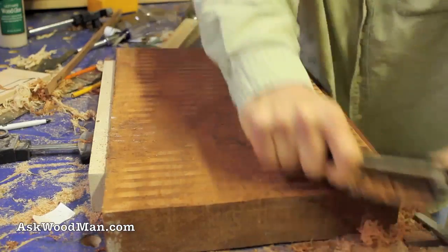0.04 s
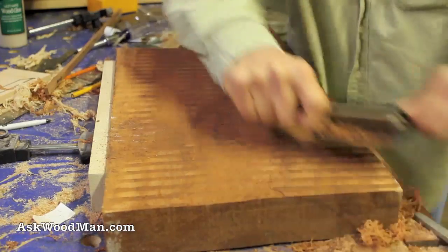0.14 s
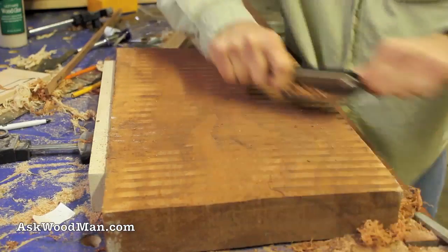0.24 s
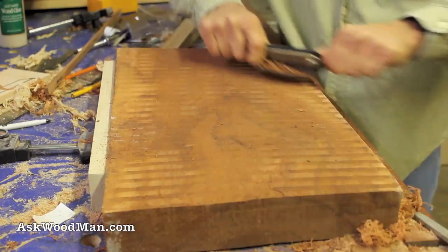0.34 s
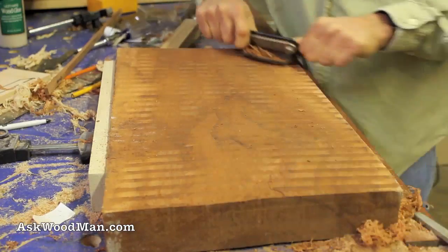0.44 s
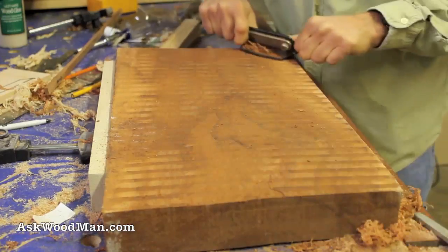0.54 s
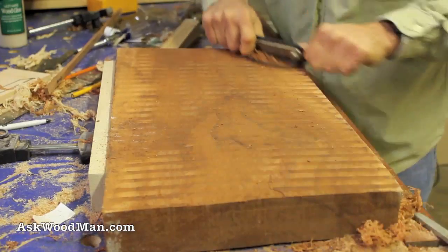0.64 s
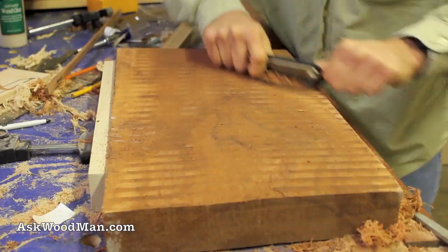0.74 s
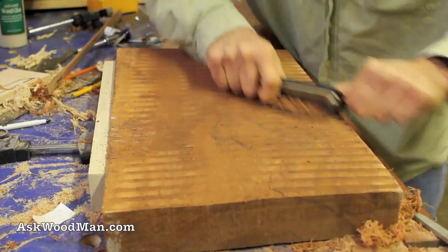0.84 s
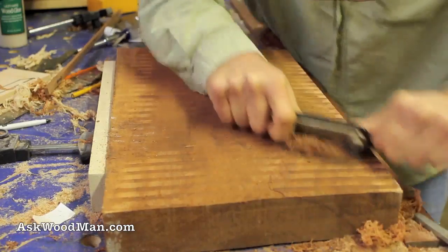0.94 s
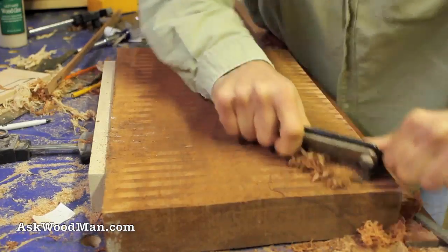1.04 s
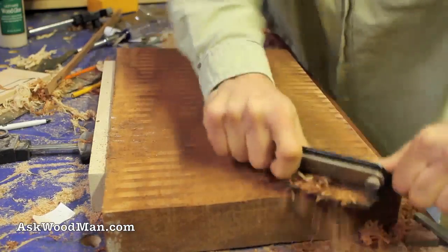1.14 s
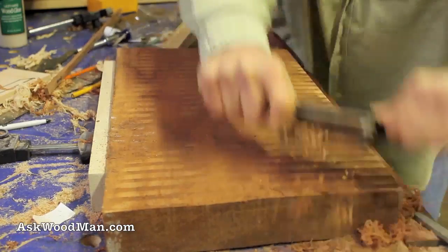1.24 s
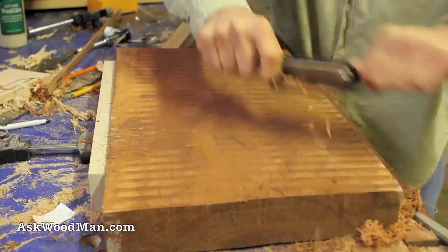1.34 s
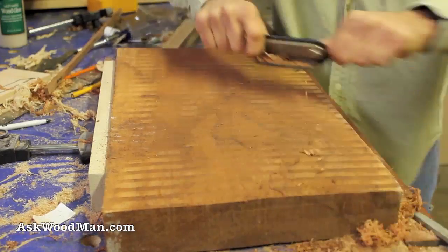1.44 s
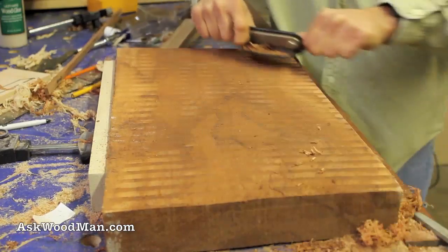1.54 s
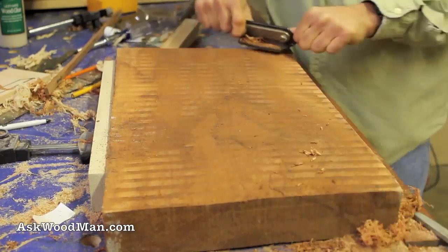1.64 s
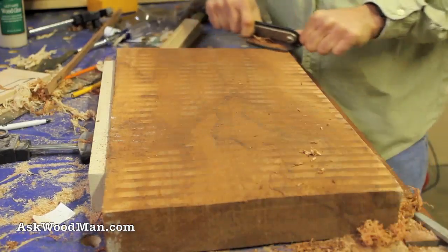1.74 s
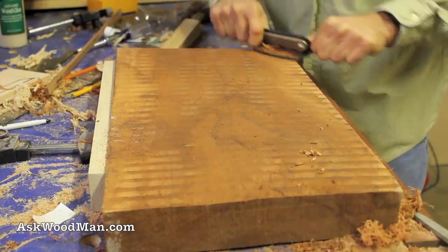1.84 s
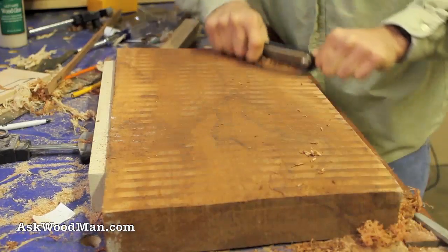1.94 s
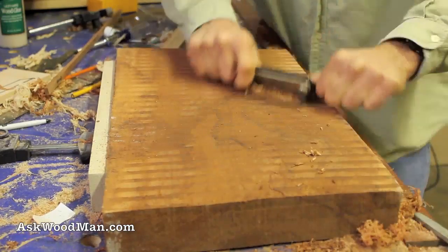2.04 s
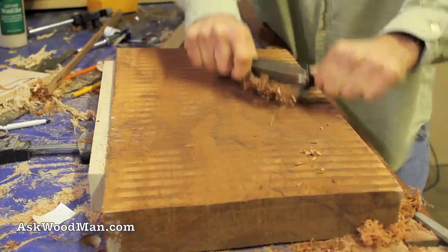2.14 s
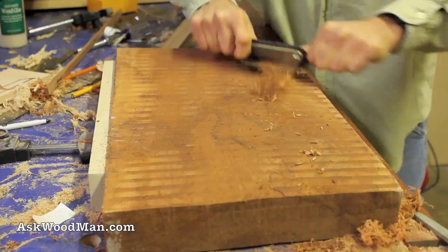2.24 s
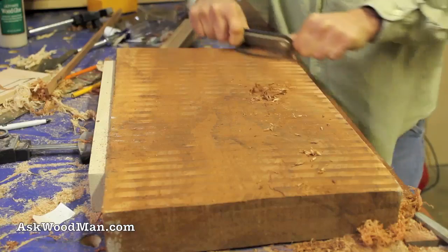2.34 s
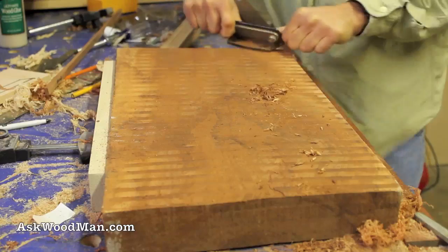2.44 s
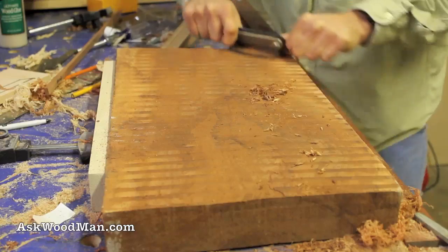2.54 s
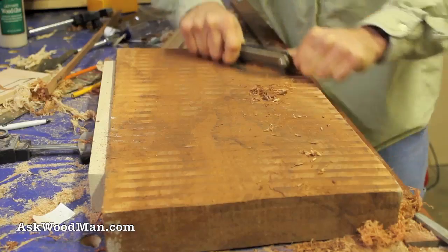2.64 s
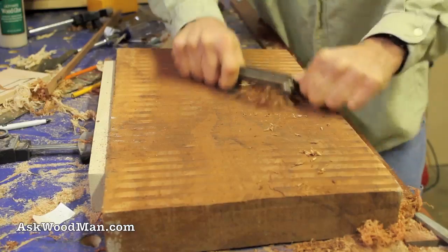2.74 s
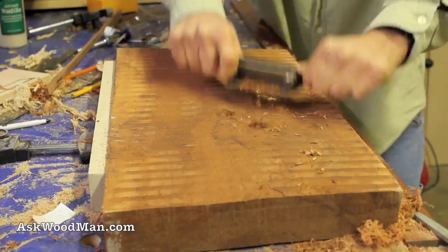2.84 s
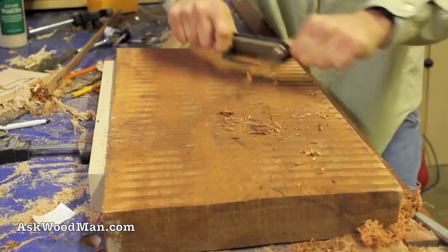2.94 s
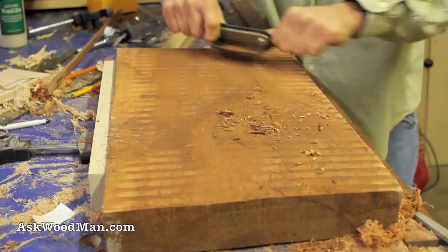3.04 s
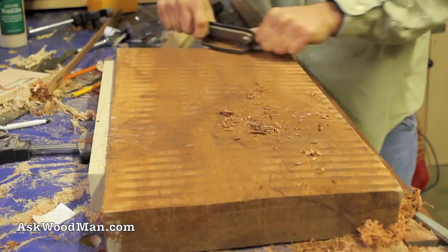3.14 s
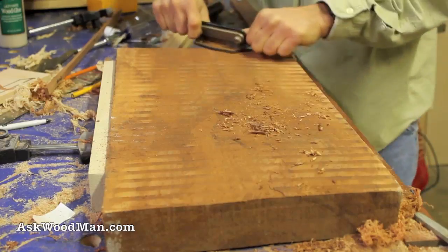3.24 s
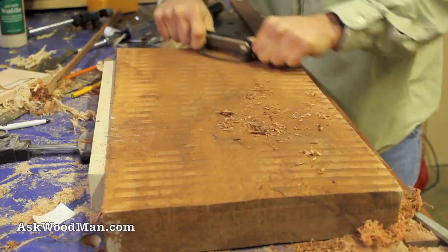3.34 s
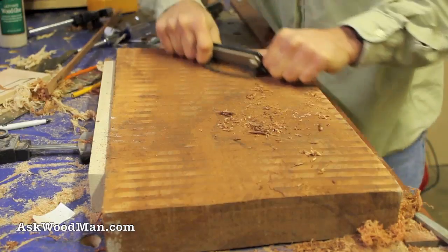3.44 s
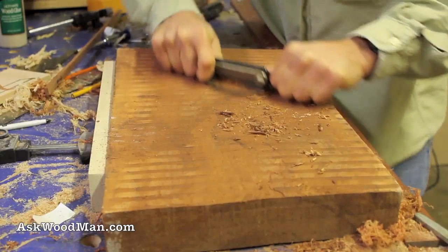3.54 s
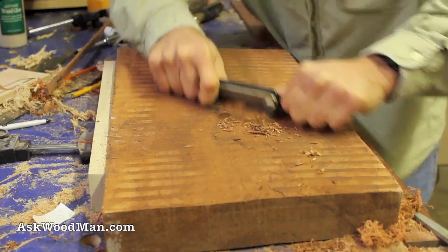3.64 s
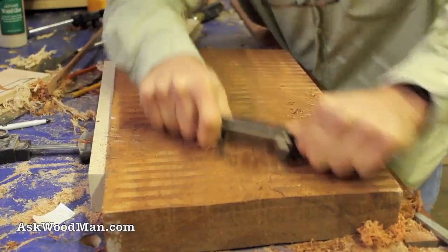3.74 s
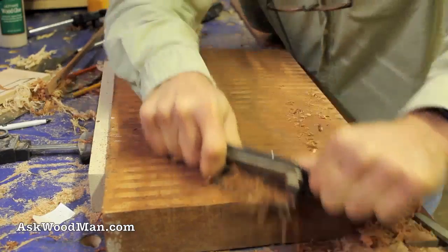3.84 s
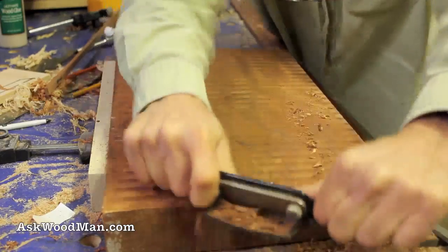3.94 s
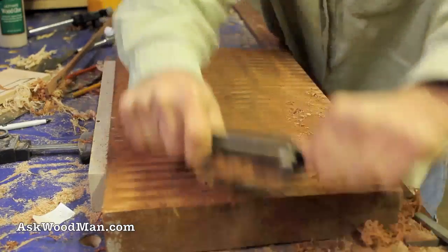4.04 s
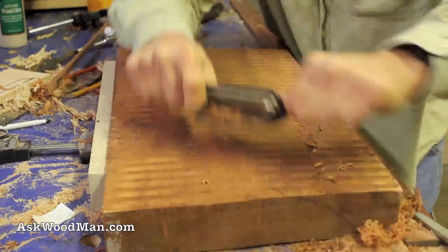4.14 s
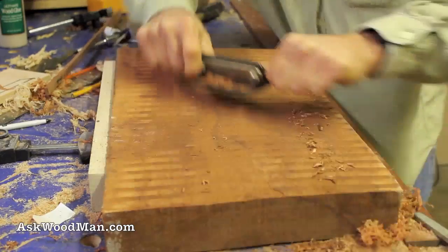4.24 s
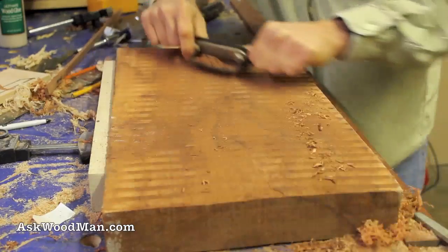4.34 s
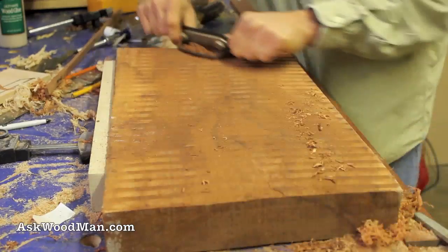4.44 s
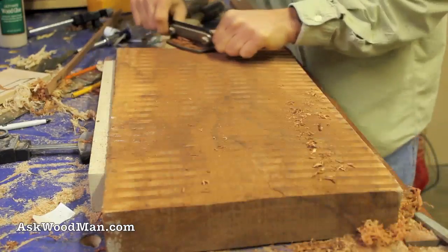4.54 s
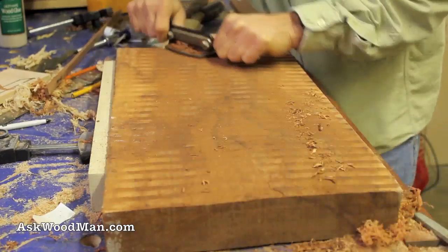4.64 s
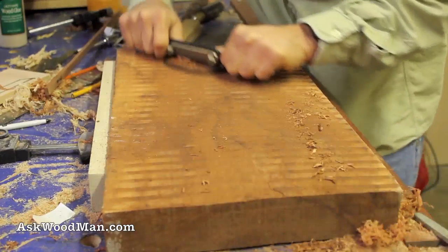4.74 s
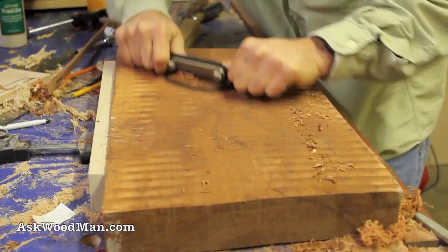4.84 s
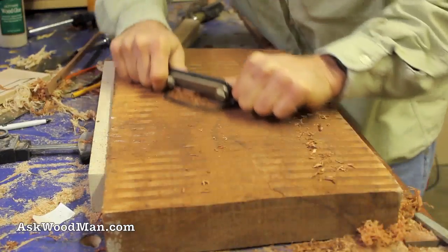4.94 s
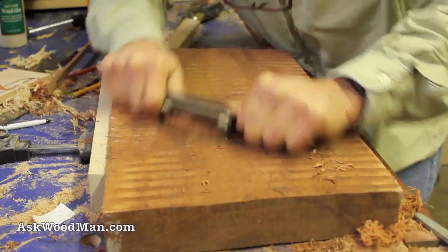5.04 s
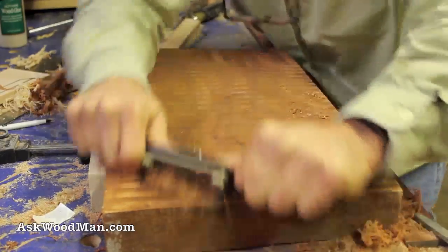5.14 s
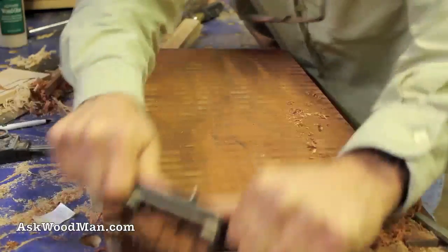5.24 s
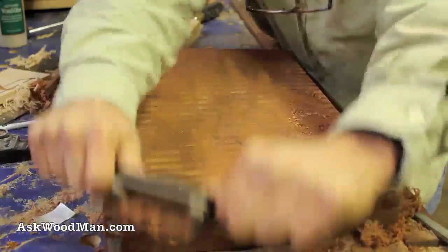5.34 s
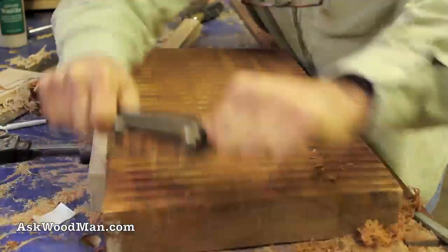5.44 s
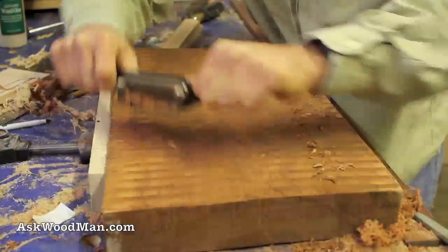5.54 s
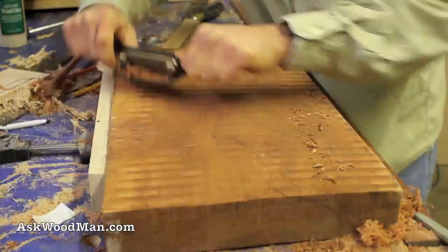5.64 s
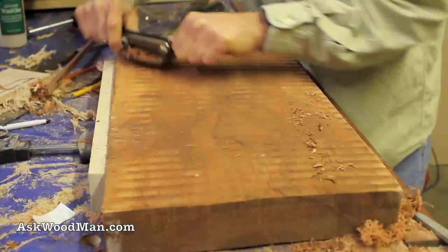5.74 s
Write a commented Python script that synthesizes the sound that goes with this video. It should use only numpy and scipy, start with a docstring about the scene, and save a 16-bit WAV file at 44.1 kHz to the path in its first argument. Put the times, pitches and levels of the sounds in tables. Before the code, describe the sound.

Harsh, dry scraping strokes of a steel blade on thick wood, broken by woody thuds, over faint hum in a small workshop.

```python
"""Scraper plane on a hardwood slab

A plane is set down with knocks and pushed over a slab: random fibre snaps hiss, ring the thin blade and
rasp, and shake the slab into a rumble. Landings are short thuds with ringing wood and steel; rubs are narrow
bands of noise, sleeves swish as shaped noise. Hum and air noise run throughout, a decaying noise tail
is the workshop, and the camera's gain drops on loud sound and creeps back in the pauses.
"""
import sys
import numpy as np
from scipy import signal
from scipy.fft import rfft, irfft, next_fast_len
from scipy.io import wavfile
from scipy.ndimage import uniform_filter1d, map_coordinates

SR = 44100
rng = np.random.default_rng(int(sys.argv[2]) if len(sys.argv) > 2 else 0)


def dump_mix(stems):
    """Bounce the given channels to the path in sys.argv[1] as a 16-bit WAV at rate SR."""
    frames = np.atleast_2d(stems).T  # one column per channel
    limited = np.clip(frames, -1, 1)  # hard clip at full scale
    pcm = np.round(limited * 32767).astype(np.int16)
    wavfile.write(sys.argv[1], SR, pcm)


N = 255691
LEAD = SR // 3  # samples computed ahead of the audible start
TIME = np.arange(-LEAD, N) / SR  # s

# Slab resonances. Each row: centre in Hz, width in Hz, relative level in dB.
SLAB_MODES = [(149.3, 9.1, 2.5), (207, 25, -3.5), (257, 40, 0), (314, 58, 4), (406, 33.5, 8), (546, 47, -2),
              (640, 43, -10), (736, 77, 5.5), (880, 52, -2.5), (1078, 58, 7.5), (1204, 360, -0.5),
              (1737, 50, 6), (1790, 150, -8.5), (2110, 130, 0.5)]


def amp(db):
    """Decibels to gain."""
    return 10 ** (np.asarray(db) / 20)


def unit(x):
    """Scale to rms 1."""
    return x / np.sqrt(np.mean(x ** 2) + 1e-20)


def noise():
    """Fresh white noise."""
    return rng.standard_normal(len(TIME))


def along(points, hz):
    """(Hz, value) points interpolated on a log frequency axis."""
    point_hz, value = np.transpose(points)
    return np.interp(np.log(hz + 1), np.log(point_hz), value)


def wobble(rate):
    """A smooth random curve, rate knots a second."""
    knots = rng.standard_normal(8192)
    return map_coordinates(knots, [np.arange(len(TIME)) * rate / SR], mode="wrap")


def filtered(x, response):
    """x through a response given as a function of frequency."""
    size = next_fast_len(len(x) + SR // 4)
    spectrum = rfft(x, size) * response(np.fft.rfftfreq(size, 1 / SR))
    return irfft(spectrum, size)[:len(x)]


def coloured(x, spectrum):
    """x given a spectrum, at rms 1."""
    return unit(filtered(x, lambda hz: amp(along(spectrum, hz))))


def ring(x, modes):
    """x through a body's resonances, summed with alternating sign."""
    def response(f):
        total = 0
        for k, (centre, width, db) in enumerate(modes):
            damping = 1j * f * width
            total = total + (-1) ** k * amp(db) * damping / (centre ** 2 - f ** 2 + damping)
        return total
    return filtered(x, response)


def butter(x, hz, kind, order):
    """A causal low-pass or high-pass."""
    sos = signal.butter(order, min(hz, SR / 2 - 1), kind, fs=SR, output="sos")
    return signal.sosfilt(sos, x)


def swell(s, length):
    """A bell-shaped rise and fall around time s, down to 1/e at length."""
    return np.exp(-((TIME - s) / length) ** 2)


def gliding_ring(x, centre_hz, width_hz):
    """x through one resonance with a time-varying centre: shift down, low-pass, shift back; rms 1."""
    turn = np.exp(2j * np.pi * np.cumsum(centre_hz) / SR)
    return unit(np.real(turn * butter(x / turn, width_hz / 2, "low", order=2)))


def patchy(x, depth_db):
    """Random gain over time and frequency: the colour shifts from one bit of grain to the next."""
    z = signal.stft(x, nperseg=512)[2]
    field = uniform_filter1d(rng.standard_normal(z.shape), size=8, axis=0)
    field = uniform_filter1d(field, size=7, axis=1)
    return signal.istft(z * amp(depth_db * unit(field)), nperseg=512)[1][:len(x)]


def background():
    """Steady air noise, and electrical lines whose phase wanders a little."""
    # Mains and motor hum, a monitor's whine. Each row: frequency in Hz, level in dB rms.
    hum_lines = [(60, -76), (120, -70.5), (241, -62.5), (360.5, -64), (480, -63.5), (1200, -64.5),
                 (2040, -66.5), (2277, -65), (2401, -72), (15735, -56)]
    # Air noise spectrum. Each row: frequency in Hz, relative density in dB.
    air_spectrum = [(15, -63), (25, -6), (207, -7), (237, -16), (278, -18), (354, -10), (394, -9),
                    (1090, -12.5), (1180, -15), (1420, -12.5), (2240, -12), (2630, -18.5), (15000, -31)]
    hum = 0
    for hz, db in hum_lines:
        phase = 2 * np.pi * hz * TIME + 0.48 * wobble(4.1)
        hum = hum + amp(db) * np.sqrt(2) * np.sin(phase)
    air = butter(coloured(noise(), air_spectrum), 45, "high", order=3)
    return hum + amp(-57.5) * air


def stroke_controls():
    """Blade, hiss, rumble gains and rasp pitch: a push digs in, settles, follows uneven wood, leaves fast."""
    # Edge in the wood. Each row: start in s, end in s, attack in s, blade ring, tearing hiss and slab rumble
    # in relative dB, rumble fade in dB per s, first rasp in Hz, last rasp in Hz.
    strokes = [ (-.3, -0.071, .04, -16.5, -21.5, -23.5, 19, 3200, 3150),
               (0.603, 0.895, 0.081, -17, -21.5, -27.5, 24, 3120, 4000),
               (0.9, 1.121, 0.011, -16.5, -23, -30.5, -9, 3100, 3350),
               (1.797, 2.07, 0.01, -19, -22.5, -25, 56, 3130, 3860),
               (2.505, 2.768, 0.052, -18, -21, -25, 34.5, 3120, 3510),
               (3.281, 3.911, 0.049, -19, -24, -32, -5, 2930, 3510),
               (4.604, 5.033, 0.13, -16, -20, -30.5, -4, 3250, 3120),
               (5.096, 5.255, 0.03, -20, -22, -29.5, 32, 3600, 3900), ]
    # Hollows (-) and ridges (+). Each row: centre in s, half length in s, change of the cut in dB.
    uneven = [ (1.022, 0.034, -16.5), (1.118, 0.034, 7.5), (1.817, 0.023, -14), (3.442, 0.027, -3),
              (3.74, 0.013, 8.5), (3.786, 0.054, -4.5), (4.639, 0.022, -2.5), (5.02, 0.0096, -2),
              (5.197, 0.016, -5), ]
    bite_peak_db, bite_s = 3, 0.063  # extra blade ring as it digs in
    hiss_change_db = -3  # over a push, the tearing hiss thins out a little
    waver_db, waver_rate_hz = 1.5, 22  # cut wavers with the grain
    lump_db, lump_rate_hz = 2.5, 28  # slab rumbles in lumps
    entry_power, release_s = 0.79, 0.0088
    wander_hz, wander_rate_hz = 130, 20  # rasp pitch drifts with the load on the edge

    gains = np.zeros((3, len(TIME)))
    rasp_hz = np.full(len(TIME), float(strokes[0][-1]))
    cut_db = sum(db * swell(s, length) for s, length, db in uneven)
    cut_db = cut_db + waver_db * wobble(waver_rate_hz)
    lumps_db = lump_db * wobble(lump_rate_hz)
    for start, end, attack, blade_db, hiss_db, slab_db, fade, first_hz, last_hz in strokes:
        age = np.clip(TIME - start, 0, end - start)
        progress = age / (end - start)
        entry = np.minimum(age / attack, 1)
        contact = np.clip(np.minimum(TIME - start, end + release_s - TIME) / release_s, 0, 1)
        cutting = contact * entry ** entry_power
        bite_db = bite_peak_db * entry * np.exp(-(np.maximum(age - attack, 0) / bite_s) ** 2)
        gains += [cutting * amp(blade_db + cut_db + bite_db),
                  cutting * amp(hiss_db + cut_db + hiss_change_db * progress),
                  contact * amp(slab_db + lumps_db - fade * age)]
        glide_hz = first_hz + (last_hz - first_hz) * progress ** 2
        rasp_hz = np.where(TIME >= start, glide_hz, rasp_hz)
    return *gains, rasp_hz + wander_hz * wobble(wander_rate_hz)


def fractures(rate, spread_db):
    """Tiny snaps of wood fibres, on average rate a second, of random sign and unequal size."""
    snaps = rng.random(len(TIME)) < rate / SR
    return unit(snaps * np.sign(noise()) * amp(spread_db * np.clip(noise(), -2, 2)))


def scrape():
    """Tearing fibres hiss, ring the blade and shake the slab; the rasp's pitch glides."""
    # Blade resonances. Each row: centre in Hz, width in Hz, relative level in dB.
    blade_modes = [(2557, 110, 3), (2850, 113, 1), (3300, 226, 3.5), (3770, 160, -6.5)]
    # Spectra of tearing hiss and slab rumble. Each row: frequency in Hz, relative density in dB.
    tearing_spectrum = [(1200, -32), (2000, -9), (3000, -15.5), (4300, 2), (5200, 0), (6150, 2.5),
                        (6700, 1), (7800, -1), (8800, -9), (9800, -6), (10500, -11), (11300, -5.5),
                        (12400, -6.5), (14200, -7), (15800, -9.5)]
    rumble_spectrum = [(29, -84), (50, -53), (86, -24), (167, -9), (272, 2), (392, 0.5), (591, -5.5),
                       (750, -6), (811, -5.5), (997, -9.5), (1150, -5.5), (1430, -12), (2200, -7),
                       (2860, -37), (4840, -120)]
    blade_gain, hiss_gain, slab_gain, rasp_hz = stroke_controls()
    grip = unit(amp(0.57 * wobble(60)))

    steel = unit(ring(grip * fractures(rate=9000, spread_db=6.5), blade_modes))
    rasp = gliding_ring(grip * fractures(rate=16000, spread_db=8.0), rasp_hz, width_hz=1050)
    blade = unit(butter(steel + rasp, 2610, "high", order=6))

    # sparser, coarser snaps of splinters, about fifty a second, faint among the fine ones
    splinters = amp(-21) * fractures(rate=50, spread_db=2)
    tearing = grip * fractures(rate=12000, spread_db=7.0) + splinters
    hiss = coloured(patchy(tearing, depth_db=2.0), tearing_spectrum)

    jolts = grip * fractures(rate=1600, spread_db=1.5)
    slab_ring = unit(butter(ring(jolts, SLAB_MODES), 680, "low", order=1))
    slab = unit(coloured(jolts, rumble_spectrum) + amp(-17.5) * slab_ring)
    slab = butter(slab, 123, "high", order=2)
    return blade_gain * blade + amp(4.0) * hiss_gain * hiss + amp(-2.5) * slab_gain * slab


def workshop(x, delay):
    """The room's diffuse answer: a noise tail, delay in s, with its own decay at each frequency."""
    # Decay. Each row: frequency in Hz, t60 in s.
    decay_t60 = [(100, 0.61), (400, 0.39), (1040, 0.54), (2760, 0.5), (7000, 0.46), (14000, 0.24)]
    # Tail colour. Each row: frequency in Hz, gain in dB.
    room_colour = [(100, 5.5), (1000, 7), (3500, -3.5), (7000, -3.5), (14000, -2.5)]
    hz, t, z = signal.stft(rng.standard_normal(SR), SR, nperseg=256)
    decay = amp(-60 * t / along(decay_t60, hz)[:, None])
    tail = signal.istft(z * decay, SR, nperseg=256)[1]
    tail = filtered(tail / np.linalg.norm(tail), lambda f: amp(along(room_colour, f)))
    return signal.fftconvolve(x, np.pad(tail, (int(delay * SR), 0)))[:len(x)]


def sleeves():
    """Cloth brushes softly as the arms draw the plane back: swells of patchy noise."""
    # Each row: centre in s, half length in s, level in dB.
    swishes = [(0.474, 0.31, -49), (1.764, 0.055, -65), (2.295, 0.63, -44.5), (4.31, 1, -47),
               (5.772, .13, -51)]
    # Cloth spectrum. Each row: frequency in Hz, relative density in dB.
    cloth_spectrum = [(100, -15), (300, 14.5), (1200, 4.5), (3000, 6.5), (7000, -1.5), (11000, 0),
                      (15800, -4.5)]
    motion = sum(amp(db) * swell(s, length) for s, length, db in swishes)
    return motion * amp(wobble(18)) * coloured(patchy(noise(), depth_db=3.0), cloth_spectrum)


def knocks():
    """Each landing is a thud of about two cycles and a crack; slab, bench, steel and handle ring on."""
    # Sole meets slab. Each row: time in s, thud in dB, thud pitch in Hz, slab ring in dB, contact softness
    # cut-off in Hz, steel clack in dB, handle ring in dB, bench boom in dB.
    landings = [ (0.5053, -14.5, 640, -17, 770, -30, -57, -40), (1.7031, -1, 735, -9, 860, -21, -29, -41),
                (2.3315, -5, 730, -13, 1060, -29.5, -23, -38),
                (3.1777, -3, 800, -6.5, 1020, -4, -24.5, -31.5),
                (4.4225, -1.5, 750, -7.5, 1430, -22, -48, -30.5),
                (4.536, -34, 700, -17.5, 930, -33, -39, -37), ]
    # Resonances of bench, steel, and plane body with handle.
    # Each row: centre in Hz, width in Hz, relative level in dB.
    bench_modes = [(65, 3.7, -2), (98, 28, -9), (130, 11, 11)]
    clack_modes = [(1800, 120, 4.5), (2520, 340, 6.5), (3120, 130, 6.5), (3550, 100, 6.5),
                   (4740, 730, -2.5), (6060, 310, -10), (7800, 23, -10)]
    handle_modes = [(1806, 34, 1), (2028, 50, 0.5)]
    crack_db, crack_s = -8.5, 0.0002  # steel on wood: level relative to the clack, half length

    out, t = np.zeros(len(TIME) + SR), np.arange(SR // 2) / SR
    direct = out[:len(TIME)]  # a view: adding to it fills out
    for s, thud_db, thud_hz, slab_db, soft_hz, clack_db, handle_db, boom_db in landings:
        direct -= amp(thud_db) * swell(s, .8 / thud_hz) * np.cos(2 * np.pi * thud_hz * (TIME - s))
        # the plane rocks and settles just after the blow
        settle = rng.standard_normal(len(t)) * amp(-60 * t / .17)
        blow = (t == 0) + amp(1.5) * settle / np.linalg.norm(settle)
        wood = butter(ring(blow, SLAB_MODES), soft_hz, "low", order=4)
        bench = butter(ring(blow, bench_modes), 93, "low", order=2)
        steel, handle = ring(blow, clack_modes), ring(blow, handle_modes)
        direct += amp(clack_db + crack_db) * swell(s, crack_s) * noise()
        parts = [(slab_db, wood), (boom_db, bench), (clack_db, steel), (handle_db, handle)]
        for db, part in parts:
            out[LEAD + round(s * SR):][:len(t)] += amp(db) * part / np.abs(part).max()
    return direct


def rubs():
    """The sole drags or the edge squeaks: friction noise briefly sounds one resonance."""
    # Each row: centre in s, half length in s, level in dB, resonance in Hz, width in Hz.
    rub_rows = [ (0.593, 0.016, -32, 4600, 2540), (1.054, 0.044, -26.5, 295, 106),
                (1.07, 0.019, -30.5, 1140, 118), (1.857, 0.022, -24, 1480, 303),
                (4.586, .05, -40, 3450, 900), (4.663, 0.053, -36, 173, 80.5), (5.081, 0.022, -32, 630, 453),
                (5.118, .014, -12, 3230, 300), ]
    out = 0
    for s, length, db, hz, width in rub_rows:
        tone = gliding_ring(noise(), np.full(len(TIME), hz), width)
        out = out + amp(db) * swell(s, length) * tone
    return out


def scene():
    """Plane, slab and room at one microphone."""
    cut, landings = scrape() + rubs(), knocks()
    room = workshop(amp(-8.5) * cut, delay=.012)
    room = room + workshop(amp(-12.5) * landings, delay=0.0065)
    mono = (cut + landings + room + sleeves() + background())[LEAD:]
    return np.array([mono, mono])


def gain_control(x, target_db, most_db, recovery_db):
    """Gain drops within milliseconds on loud sound and creeps back by recovery_db a second."""
    level_db = 10 * np.log10(np.abs(butter(x ** 2, 17.0, "low", order=1)) + 1e-12)
    creep_db = recovery_db * np.arange(N) / SR
    held_db = np.maximum.accumulate(level_db + creep_db) - creep_db
    gain_db = np.minimum(most_db, target_db - held_db)
    return x * amp(butter(gain_db, 79, "low", order=1))


def record(dry):
    """The camera rides its gain, rounds off the tallest peaks and keeps nothing above its band limit."""
    top_hz = 15850
    x = gain_control(dry[0], target_db=-13.5, most_db=0.5, recovery_db=12)
    x = x / (1 + x ** 8) ** (1 / 8)
    x = filtered(x, lambda hz: hz < top_hz)
    return np.array([x, x])


dry = scene()
out = record(dry)
dump_mix(out)
```